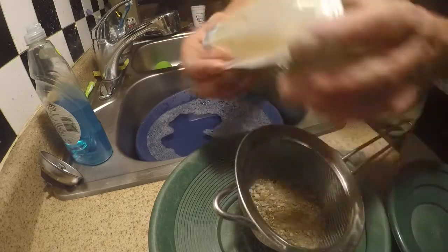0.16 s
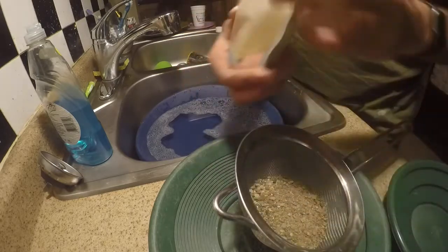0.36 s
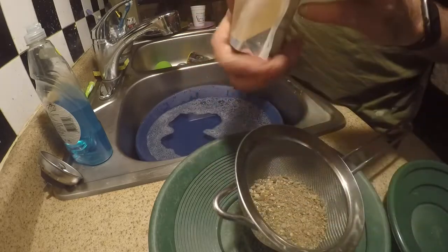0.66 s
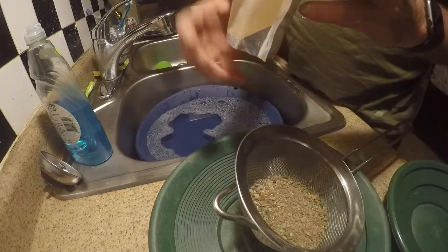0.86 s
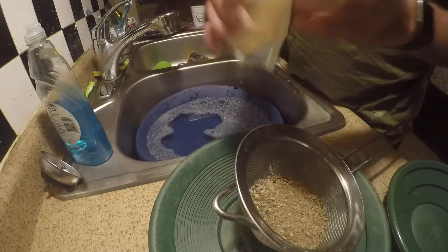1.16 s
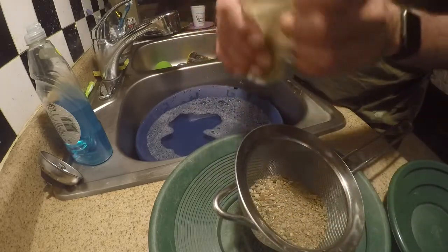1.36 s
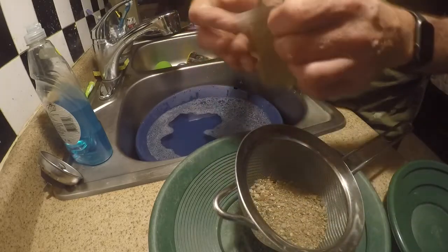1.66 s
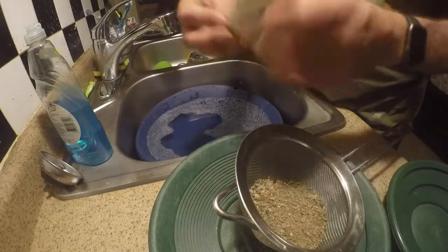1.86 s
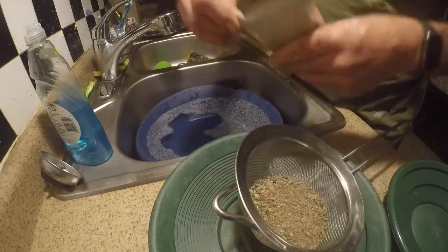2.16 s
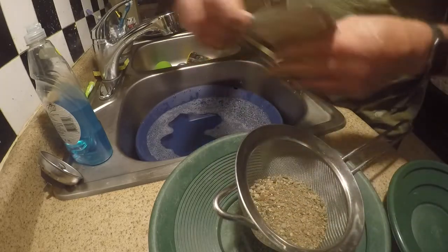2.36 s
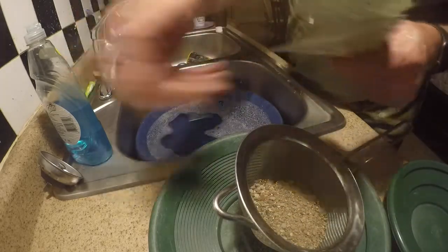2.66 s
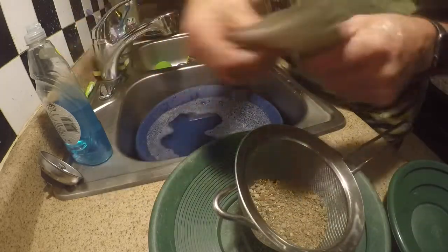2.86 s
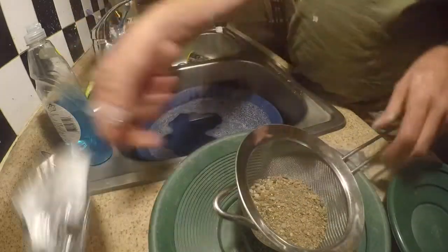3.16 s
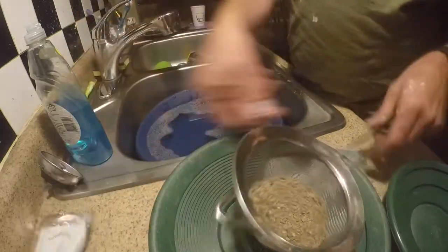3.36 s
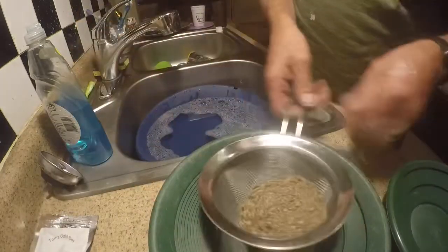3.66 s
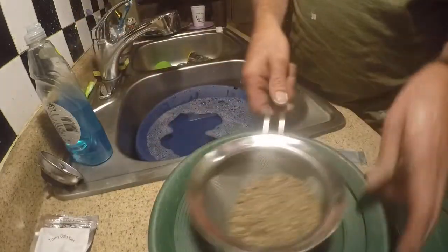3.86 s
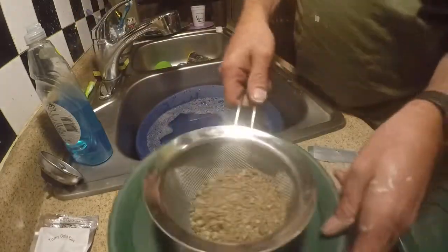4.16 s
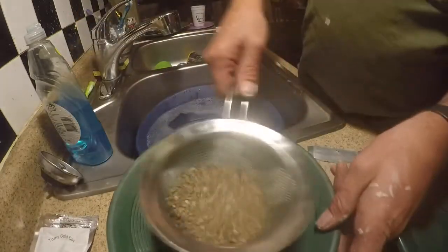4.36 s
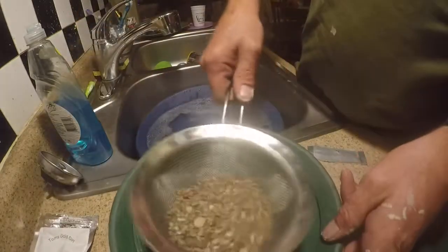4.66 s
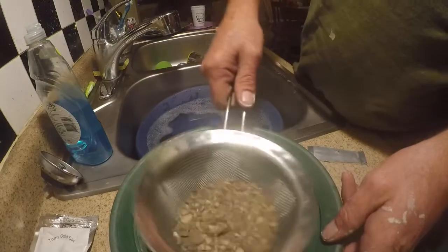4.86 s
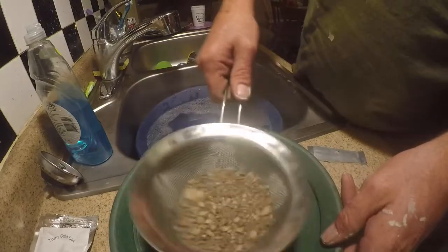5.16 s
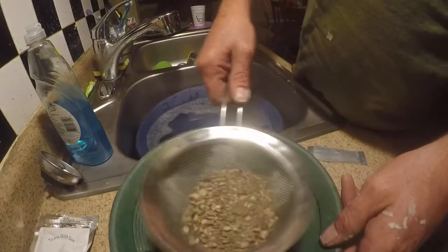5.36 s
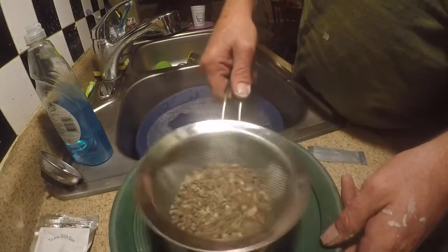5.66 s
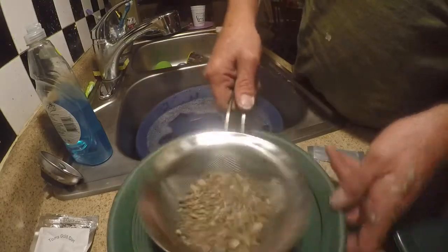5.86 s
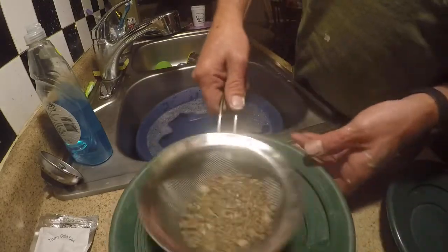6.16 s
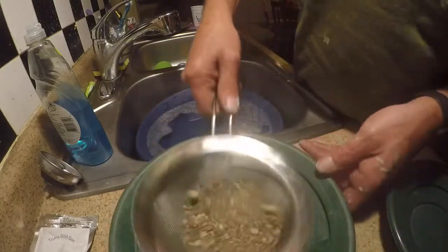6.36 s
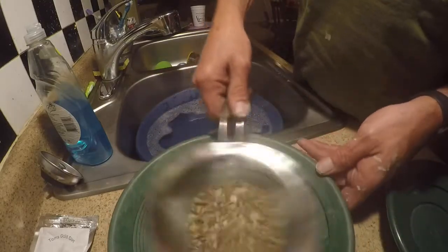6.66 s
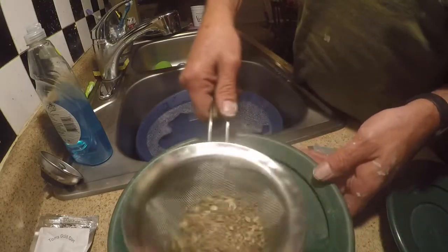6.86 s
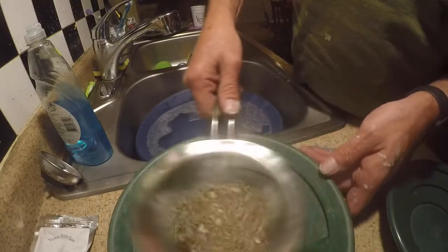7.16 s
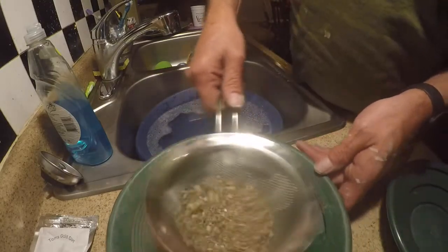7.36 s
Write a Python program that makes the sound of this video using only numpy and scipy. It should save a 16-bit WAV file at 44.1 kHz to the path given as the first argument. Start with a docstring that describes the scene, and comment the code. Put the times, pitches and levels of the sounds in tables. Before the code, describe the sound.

A stiff foil pouch crackles loudly as it is crumpled and dropped on a counter, then dry gravel hisses in a shaken metal strainer.

```python
"""An emptied foil pouch is crumpled, folded and dropped on a kitchen counter: noise bursts ring at the pitch
of each crease over a crackle of filtered clicks, lumps of air and soft thumps. Then a mesh strainer of dry gravel
ticks as it is lifted off a plastic pan, the pan is nudged over the counter (clicks into its modes, with knocks),
and the strainer is shaken, so grit hisses through the mesh as dense ticks in broad bands. A short kitchen echo
answers the near sounds, and a low rumble and a wavering hum, both filtered noise, lie under it all."""
import sys
import numpy as np
from scipy import signal
from scipy.fft import rfft, irfft, next_fast_len
from scipy.io import wavfile
from scipy.ndimage import uniform_filter1d

SR = 44100
rng = np.random.default_rng(int(sys.argv[2]) if len(sys.argv) > 2 else 0)


def inscribe(sig):
    """Save sig as 16-bit PCM at rate SR to the path in sys.argv[1].

    A 1-D sig is mono; a 2-D sig holds one channel per row.
    Samples are clipped to [-1, 1] before scaling.
    """
    pcm = np.round(np.clip(np.atleast_2d(sig).T, -1, 1) * 32767)
    wavfile.write(sys.argv[1], SR, pcm.astype(np.int16))


N = 331632

# The bright colour of crinkled foil, also lent to the strainer's ticks.
# Each row: frequency in Hz, density in dB per Hz.
FOIL_COLOUR = [(180, -50), (300, -1.5), (397, -14.5), (579, -0.5), (694, -7.5), (933, -3.5), (1060, -6.5),
               (1480, 1), (2230, 0.5), (3100, 1.5), (4450, -8), (6090, -5), (8500, -16), (10000, -13.5),
               (10700, -13.5), (11500, -20), (13900, -14), (15300, -18.5)]
# The low modes of the plastic pan and the counter.
# Each row: frequency in Hz, width in Hz, level in dB.
PAN_MODES = [(70.4, 16, -7.5), (128.3, 16.5, 4), (168.7, 11.4, -1), (262, 91, -10), (377, 34, -2),
             (445.5, 18, -7), (548, 87, -11.5)]
# The strainer ticking on the pan as it is picked up.
# Each row: start in seconds, peak of the body in dB, ring in Hz, treble against the body in dB.
STRAINER_TICKS = [(3.4514, -43, 1230, -21), (3.477, -41, 1470, -14), (3.5142, -34, 1260, 1.5),
                  (3.534, -34, 1000, -4), (3.5775, -26.5, 1340, -6), (3.688, -26.5, 1150, -17),
                  (3.7105, -28.5, 1800, -16), (3.7495, -18.5, 1040, -19), (3.787, -20, 1500, -5),
                  (3.8017, -13.5, 1260, -31), (3.866, -15.5, 960, -15), (3.876, -27, 1300, -20),
                  (3.89, -38, 1290, -20), (4.01, -17.5, 1200, -28)]


def pouch_snaps():
    """The louder creases of the pouch snap over, each with a crack and a short rattle."""
    # Each row: start in seconds, peak of the body in dB, ring in Hz, treble against the body in dB.
    creases = [(0.014, -24.5, 1340, -32), (0.125, -33, 2500, -25), (0.142, -22, 2270, -17),
               (0.15, -26, 2300, -25), (0.1692, -26, 3800, 3.5), (0.2103, -24, 1500, -22),
               (0.2328, -19, 3610, -7.5), (0.3601, -28, 1490, -16.5), (0.4348, -30.5, 1600, -25),
               (0.5781, -24.5, 1250, -38), (0.588, -30, 2220, -20), (0.6414, -36, 1490, -38),
               (0.6628, -20, 1540, -34), (0.6744, -19.5, 1400, -13.5), (1.039, -31, 1260, -31),
               (1.061, -17, 1740, -29), (1.0843, -31, 5090, -17), (1.1109, -6.5, 3930, 0),
               (1.1182, -7.5, 3280, -10), (1.1354, -11, 2530, -21), (1.1528, -9, 3020, -10.5),
               (1.1892, -23.5, 1680, -27), (1.2126, -22, 2800, -30), (1.225, -21, 1950, -5),
               (1.2374, -20, 1600, -20), (1.2485, -12.5, 3370, -15), (1.2795, -39, 2530, -24),
               (1.292, -18.5, 3550, -5.5), (1.3103, -13.5, 2560, -8.5), (1.3676, -19, 2500, -28),
               (1.413, -14.5, 2600, -15), (1.4661, -26.5, 1920, -18), (1.5292, -16, 2700, -13),
               (1.5488, -17, 2780, -18), (1.5694, -19.5, 3300, 1.5), (1.616, -23, 3090, -16),
               (1.6241, -18.5, 3780, -2.5), (1.6278, -16, 1400, -0.5), (1.7198, -25.5, 2740, -1),
               (1.7508, -16, 3170, -13), (1.801, -23.5, 3460, -9), (1.835, -19, 1630, -17),
               (1.878, -14, 2800, -6), (1.8964, -22, 3440, 2), (1.9056, -21.5, 2740, -30),
               (1.924, -16, 2430, -26), (1.944, -27, 3000, -5), (1.9584, -8, 1300, -2),
               (1.9661, -4, 3050, -34), (1.9755, -14.5, 2980, 1), (1.9908, -12, 3500, 1.5),
               (2.0302, -18, 5930, -19), (2.0404, -14, 2560, -33), (2.0715, -33, 1900, -15),
               (2.1005, -24.5, 3580, -3.5), (2.1306, -17, 2560, -28), (2.144, -20, 3270, 1),
               (2.171, -36, 3930, -20), (2.1794, -18.5, 3400, -21), (2.2114, -16.5, 3480, -3),
               (2.2255, -18, 3580, 7.5), (2.2622, -20, 1800, -25), (2.2686, -11.5, 3270, -10),
               (2.3103, -15, 1760, -11), (2.36, -29.5, 1680, -14), (2.3878, -34, 1690, -0.5),
               (2.42, -34.5, 3320, -32), (2.5676, -35, 1720, -15), (2.657, -30.5, 2550, -33),
               (2.7347, -21.5, 5530, -5.5), (2.7757, -24.5, 1630, -4), (2.8052, -25, 1890, 1.5),
               (2.851, -20.5, 3200, -7.5), (2.861, -22, 3520, -3), (2.9903, -26, 3140, -34),
               (2.9959, -20, 2090, -35), (3.1512, -37, 1050, -23), (3.2095, -35, 2500, -4),
               (3.2141, -6.5, 2850, -10.5), (3.2494, -19.5, 940, -29), (3.3262, -18.5, 4240, -13),
               (3.3452, -16.5, 3540, -4.5)]
    return snaps(creases, crack_t60_s=0.0046, rattle_t60_s=0.048, rattle_db=1.5,
                 width_hz=415, broad_db=-6, click=3.6)


def crumple():
    """Small creases crackle in clumps, each ringing at the pitch of its facet; the moving sheet pushes lumps of air."""
    # The pouch moving in the hands, as a bed of crackle. Each row: time in seconds, level in dB.
    handling = [(0, -58), (0.68, -64.5), (0.74, -66), (1.03, -71), (1.05, -54), (1.2, -46.5), (1.8, -47.5),
                (2.3, -39.5), (2.4, -48), (2.5, -65.5), (2.72, -60), (2.74, -32.5), (2.85, -49),
                (2.92, -60), (3.18, -85), (3.25, -43.5), (3.36, -51.5), (3.5, -80), (3.66, -75)]
    # Squeezes of the fingers, then the pouch landing on the counter and settling.
    # Each row: peak time in seconds, crackle in dB, air and thump in dB.
    surges = [(0.0, -50, -37), (0.1, -69, -66), (0.127, -43.5, -60), (0.17, -63, -51), (0.23, -61, -42),
              (0.68, -58, -45), (1.04, -84, -47.5), (1.131, -44, -33), (1.24, -38, -39),
              (1.312, -36.5, -50), (1.41, -53, -51), (1.53, -51, -39.5), (1.631, -41.5, -36.5),
              (1.871, -32.5, -28), (2.001, -26.5, -28), (2.048, -52, -35), (2.192, -34.5, -44.5),
              (2.292, -31, -30), (2.55, -54, -47), (2.631, -75, -46), (2.87, -48, -40), (3.019, -66, -43.5),
              (3.263, -71, -23.5), (3.522, -70, -52)]
    rise_db_per_s, fall_db_per_s = 360, 515
    bed_thump_db = -8   # the air the bed pushes, against its crackle

    bed, = gains(handling)
    surge_crackle = peaks([(s, db) for s, db, _ in surges], rise_db_per_s, fall_db_per_s)
    surge_thump = peaks([(s, db) for s, _, db in surges], rise_db_per_s, fall_db_per_s)
    crackle_gain = bed + surge_crackle
    thump_gain = from_db(bed_thump_db) * bed + surge_thump

    creases = grains(2500, spread_db=3.5) * from_db(3.0 * drift(50))
    # every crease is dealt to one of sixteen facet pitches
    pitches = np.geomspace(900, 7000, 16)
    dealt = rng.integers(0, 16, N)
    rings = sum(resonance(creases * (dealt == k), hz, 0.049 * hz) / np.sqrt(hz)
                for k, hz in enumerate(pitches))
    dry_and_ringing = rms_one(rings) + from_db(8) * rms_one(creases)
    crackle = rms_one(colour(dry_and_ringing, FOIL_COLOUR))

    lumpy_air = rng.standard_normal(N) * from_db(6.1 * drift(37.5))
    thump = rms_one(colour(lumpy_air, [(30, 2.5), (110, 1.0), (350, -1), (700, -6.0), (1500, -41.5)]))
    return crackle_gain * crackle + thump_gain * thump


def strainer_ticks():
    """The strainer strikes the pan: a crack like the pouch's, with a longer and weaker rattle."""
    return snaps(STRAINER_TICKS, crack_t60_s=0.0067, rattle_t60_s=0.13, rattle_db=-9.5,
                 width_hz=580, broad_db=-7.5, click=4.7)


def snaps(events, crack_t60_s, rattle_t60_s, rattle_db, width_hz, broad_db, click):
    """A sharp crack and a dying rattle, ringing at a pitch of its own over the colour of the material."""
    broad_reach = 2.3   # the broad colour reaches this many times the ring pitch
    lump_db, lump_s = 3.5, 0.0018   # the rattle comes in uneven lumps
    out, t = np.zeros(N), np.arange(2048) / SR
    noise, lumps = rng.standard_normal((len(events), 2, 2048)).transpose(1, 0, 2)
    lumps = rms_one(uniform_filter1d(lumps, size=round(lump_s * SR)))
    high = signal.butter(4, 7000, "high", fs=SR, output="sos")
    for (s, peak_db, hz, treble_db), draw, lump in zip(events, noise, lumps):
        draw = np.r_[click, draw[1:]]   # the flip itself leads
        crack = from_db(-60 * t / crack_t60_s)
        rattle = from_db(rattle_db + lump_db * lump - 60 * t / rattle_t60_s)
        burst = draw * (crack + rattle)

        coloured = colour(burst, FOIL_COLOUR)
        low_pass = signal.butter(2, broad_reach * hz, fs=SR, output="sos")
        broad = signal.sosfilt(low_pass, coloured)
        ring = resonance(resonance(burst, hz, width_hz), hz, 2 * width_hz)
        body = ring + from_db(broad_db) * broad
        body -= signal.sosfiltfilt(high, body)   # the treble has its own share
        treble = signal.sosfilt(high, coloured)
        sound = body / np.abs(body).max() + from_db(treble_db) * treble / np.abs(treble).max()
        add(out, from_db(peak_db) * sound, s)
    return out


def sifting():
    """Thousands of grains tick on the wires; the steel bowl lifts a row of broad bands."""
    # Gravel sliding as the strainer is swirled. Each row: time in seconds, hiss in dB.
    swirl = [(3.64, -93), (3.68, -52), (3.9, -76), (4.05, -69), (4.19, -57), (4.27, -52.5), (4.29, -42.5),
             (4.36, -48), (4.385, -48), (4.49, -58.5), (4.61, -54.5), (4.68, -48.5), (4.82, -54),
             (4.97, -47.5), (5.02, -51), (5.26, -47.5), (5.35, -54), (5.42, -47), (5.61, -53),
             (5.72, -47.5), (6.09, -44), (6.13, -50.5), (6.26, -39), (6.37, -49), (6.57, -48.5), (6.7, -43),
             (7.52, -42)]
    # The colour of grit on wire. Each row: frequency in Hz, density in dB per Hz.
    grit_colour = [(400, -41), (650, -12), (1370, -4), (2770, -1), (4000, -2), (4450, -5), (5000, -0.5),
                   (6100, -0.5), (10700, -2.5), (11400, -5.5), (13500, 2), (15300, 2.5)]
    # The bands of the bowl. Each row: frequency in Hz, width in Hz, level in dB.
    bowl_bands = [(2750, 300, -2), (3800, 600, -1), (6020, 300, 0), (6400, 400, -3), (7600, 450, 0),
                  (9050, 500, 0), (10700, 500, 2)]
    stir_db, stir_fall_db_per_s = -29, 406   # each strainer tick stirs the gravel: hiss against its peak

    hits = grains(10000, spread_db=-0.5) * from_db(2.15 * drift(24))
    ticks = colour(hits, grit_colour)
    rings = sum(from_db(db) * resonance(ticks, hz, width) for hz, width, db in bowl_bands)
    stirred = peaks([(s, db + stir_db) for s, db, *_ in STRAINER_TICKS], 3000, stir_fall_db_per_s)
    hiss_gain = gains(swirl)[0] + stirred + jolts(column=4)
    return hiss_gain * rms_one(ticks + 1.2 * rings)


def pan():
    """Grit under the pan sticks and slips: dense clicks into its low, middle and high modes."""
    # The pan dragged in two pulls, one list each.
    # Each row: time in seconds, boom in dB, scratch in dB, rasp of the ridges in dB.
    pulls = [
        [(3.64, -59, -68, -86), (3.682, -56, -48, -54), (3.776, -32, -49, -48), (3.804, -55, -28.5, -32.5),
         (3.816, -30.5, -31, -36.5), (3.924, -32, -39.5, -38), (3.958, -40, -33, -39), (3.965, -43, -55, -49)],
        [(3.972, -51, -40, -68), (3.985, -39, -32, -53), (4.021, -38, -35.5, -38.5),
         (4.057, -28.5, -33.5, -37.5), (4.151, -38, -40.5, -53), (4.199, -39, -50.5, -53),
         (4.23, -70, -68, -75)],
    ]
    # Middle modes, of the rim. Each row: frequency in Hz, width in Hz, level in dB.
    rim_modes = [(658, 95, -5.5), (965, 313, 0), (1083, 217, 1.5), (1260, 44, 0), (1500, 165, -2.5)]
    # High modes, of the ridges. Each row: frequency in Hz, width in Hz, level in dB.
    ridge_modes = [(1720, 37, 13), (2240, 570, 12), (2500, 54, 21), (2800, 240, 11), (3550, 133, 14.5),
                   (3960, 240, 6)]

    boom_gain, scratch_gain, rasp_gain = np.sum([gains(pull) for pull in pulls], axis=0)
    boom_gain = boom_gain + jolts(column=3, lag_s=0.0049)   # lows come later
    scratch_gain = scratch_gain + jolts(column=1)
    rasp_gain = rasp_gain + jolts(column=2)

    slips = grains(4000, spread_db=2.5) * from_db(0.98 * drift(57))
    boom = boom_gain * pan_boom(slips)
    scratch = scratch_gain * rubbed(slips, rim_modes, wander_db=2.0)
    rasp = rasp_gain * rubbed(slips, ridge_modes, wander_db=1.0)
    return boom + scratch + rasp


def pan_boom(excite):
    """The low modes of the plastic pan and counter, driven by slips with their highs rolled off."""
    low_pass = signal.butter(2, 600, fs=SR, output="sos")
    return modes(signal.sosfilt(low_pass, excite), PAN_MODES)


def rubbed(slips, table, wander_db):
    """The contact point travels, so each mode swells and fades on its own; rms 1."""
    return rms_one(sum(from_db(db + wander_db * drift(5.2)) * resonance(slips, hz, width) * (-1) ** k
                       for k, (hz, width, db) in enumerate(table)))


def jolts(column, lag_s=0):
    """Bell-shaped swells of one level column of the pan's short jolts."""
    # Each row: peak time in seconds, scratch in dB, rasp in dB, boom in dB, thrown gravel in dB,
    # spread in seconds.
    nudges = [(4.333, -58.5, -68, -48.5, -46, 0.024), (4.472, -55, -65, -41.5, -72, 0.02),
              (5.69, -50.5, -64, -40, -69, .015), (5.744, -42.5, -48, -32.5, -55, 0.016),
              (5.812, -37, -48, -33, -73, 0.027), (5.931, -39.5, -55, -29, -51, 0.015),
              (6.028, -50, -72, -39, -75, 0.016), (6.175, -34.5, -36, -38.5, -50.5, 0.017),
              (6.256, -43.5, -42, -37.5, -42, 0.012), (6.407, -35, -36, -34, -48, 0.014),
              (6.606, -33, -39, -36, -50, 0.013), (6.735, -34, -35, -33.5, -41.5, 0.012),
              (7.3, -60, -70, -44.5, -76, 0.046), (7.36, -57, -67, -46, -65, 0.022),
              (7.425, -57, -75, -41, -74, 0.022)]
    t = np.arange(N) / SR
    return sum(from_db(row[column]) * np.exp(-.5 * ((t - row[0] - lag_s) / row[-1]) ** 2)
               for row in nudges)


def thumps_and_knocks():
    """One sine cycle of pressure pushes the panel and lets go: short contacts reach the higher modes."""
    # Soft thumps of the pouch's air, played as slow contacts, then knocks on the counter and pan.
    # Each row: start in seconds, peak in dB, contact in seconds.
    contacts = [(1.861, -24.5, 0.013), (2.194, -29, 0.0086), (3.249, -15, 0.00055), (3.263, -21.5, 0.0055),
                (3.301, -27, 0.0011), (3.307, -24, 0.0064), (3.33, -31, 0.0063), (4.055, -19.5, 0.0015),
                (4.066, -50, 0.01), (4.857, -37.5, 0.0038), (5.744, -36, 0.01), (5.923, -23.5, 0.0028),
                (5.937, -20, 0.0078), (6.181, -26, 0.011), (6.733, -31.5, 0.0019)]
    out = np.zeros(N)
    t = np.arange(12000) / SR
    for s, peak_db, contact_s in contacts:
        push = np.sin(2 * np.pi * np.minimum(t / contact_s, 1))
        ring = modes(push, PAN_MODES)
        add(out, from_db(peak_db) * ring / np.abs(ring).max(), s)
    return out


def kitchen(x):
    """Echo of the kitchen: parallel feedback delays, duller on every round."""
    t60_s, wall_cut_hz = 0.2, 17000
    size = next_fast_len(N + SR)
    hz = np.arange(size // 2 + 1) * SR / size
    dull = 1 / (1 + 1j * hz / wall_cut_hz)
    lags_s = rng.uniform(.008, 0.025, 10)
    loops = [from_db(-60 * lag / t60_s) * dull * np.exp(-2j * np.pi * hz * lag) for lag in lags_s]
    echo = sum(loop / (1 - loop) for loop in loops)   # all rounds of each loop
    return irfft(rfft(x, size) * echo, size)[:N]


def room_rumble():
    """The room's low rumble: coloured noise whose level drifts slowly."""
    # Each row: frequency in Hz, density in dB per Hz.
    rumble_colour = [(12, -50), (20, 1.5), (87, 1), (360, -17.5), (402, -20.5), (783, -29.5), (875, -27),
                     (1610, -27), (1850, -28), (2190, -25.5), (2450, -32), (3510, -25.5), (4030, -31),
                     (6290, -39), (15300, -44)]
    rumble = rms_one(colour(rng.standard_normal(N), rumble_colour))
    return from_db(-50 + 0.54 * drift(0.87)) * rumble


def hum():
    """A wavering low tone: noise through one narrow resonance."""
    return from_db(-56.5) * rms_one(resonance(rng.standard_normal(N), hz=114, width_hz=8.1))


def modes(excite, table):
    """Parallel resonances of a body, alternating in sign; rms 1."""
    return rms_one(sum(from_db(db) * resonance(excite, hz, width) * (-1) ** k
                       for k, (hz, width, db) in enumerate(table)))


def resonance(x, hz, width_hz):
    """Two-pole resonance with gain near 1 on top."""
    r = np.exp(-np.pi * width_hz / SR)
    zeros = [(1 - r * r) / 2, 0, (r * r - 1) / 2]
    poles = [1, -2 * r * np.cos(2 * np.pi * hz / SR), r * r]
    return signal.lfilter(zeros, poles, x)


def colour(x, points):
    """Causal (minimum phase) filter that follows a spectrum."""
    hz = np.maximum(np.arange(2049) * SR / 4096, 1)
    table = np.array(points)
    level_db = np.interp(np.log(hz), np.log(table[:, 0]), table[:, 1])
    cepstrum = irfft(level_db * np.log(10) / 20)
    # folding the cepstrum forward in time gives the minimum phase
    cepstrum[1:2048] *= 2
    cepstrum[2049:] = 0
    return signal.fftconvolve(x, irfft(np.exp(rfft(cepstrum))))[:len(x)]


def grains(per_s, spread_db):
    """Random clicks of uneven size and sign."""
    sizes = from_db(spread_db * np.minimum(rng.exponential(1, N), 4)) * rng.choice([-1, 1], N)
    return sizes * (rng.random(N) < per_s / SR) + 1e-18


def drift(rate_hz):
    """Slow random wander of rms 1: noise through a double one-pole low-pass."""
    r = np.exp(-2 * np.pi * rate_hz / SR)
    noise = rng.standard_normal(N + SR)   # the first second lets the filter settle
    return rms_one(signal.lfilter([1], [1, -2 * r, r * r], noise)[SR:])


def gains(rows):
    """dB columns of a table as gains in time, silent outside it."""
    s, *columns = np.transpose(rows)
    t = np.arange(N) / SR
    return [from_db(np.interp(t, s, c, left=-200, right=-200)) for c in columns]


def peaks(rows, rise_db_per_s, fall_db_per_s):
    """Gain that climbs to each (seconds, dB) and dies away again."""
    t = np.arange(N) / SR
    return sum(from_db(db - np.where(t < s, rise_db_per_s * (s - t), fall_db_per_s * (t - s)))
               for s, db in rows)


def add(out, sound, s):
    """Mix a short sound in at a time in seconds."""
    at = round(s * SR)
    out[at:at + len(sound)] += sound[:N - at]


def from_db(db):
    """Gain of a level in dB."""
    return 10 ** (np.asarray(db) / 20)


def rms_one(x):
    """Scale to rms 1."""
    return x / np.sqrt(np.mean(x ** 2) + 1e-20)


def scene():
    """Near sources with their echo, the sifting gravel without it, and the room."""
    near = pouch_snaps() + strainer_ticks() + crumple() + pan() + thumps_and_knocks()
    echo = from_db(-24.5) * kitchen(near)
    return (near + echo + sifting() + room_rumble() + hum())[None]


def record(dry):
    """A steep low-pass cuts the top."""
    low_pass = signal.ellip(12, .3, 70, 15230, fs=SR, output="sos")
    return signal.sosfilt(low_pass, dry)


dry = scene()
out = record(dry)
inscribe(out)
```